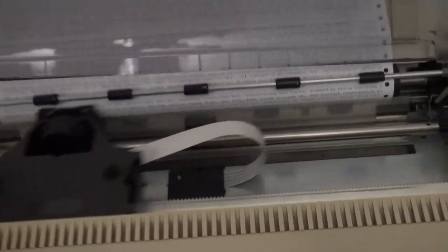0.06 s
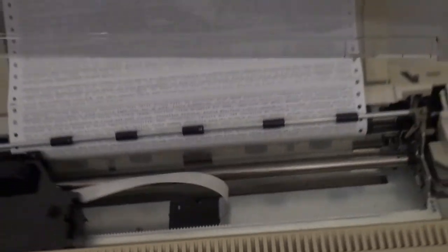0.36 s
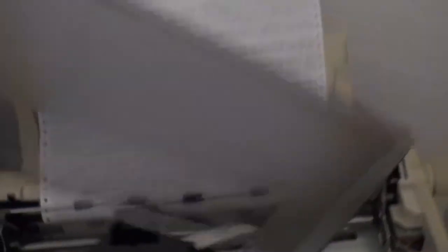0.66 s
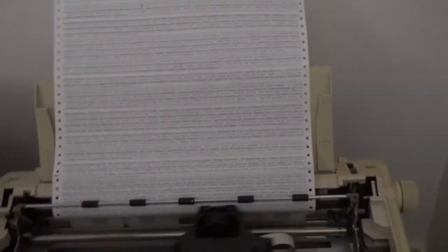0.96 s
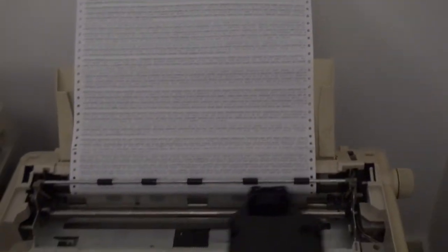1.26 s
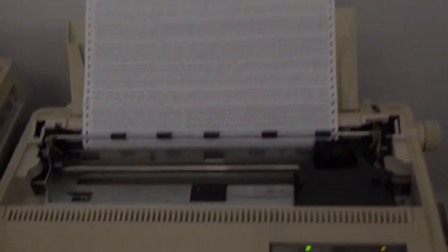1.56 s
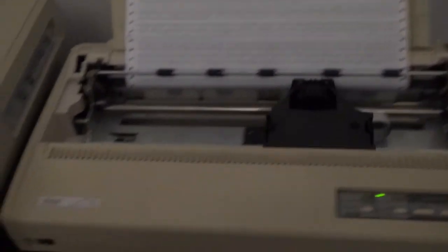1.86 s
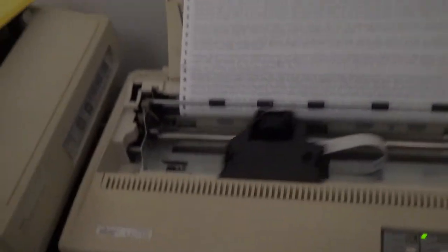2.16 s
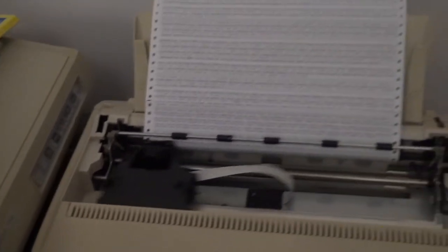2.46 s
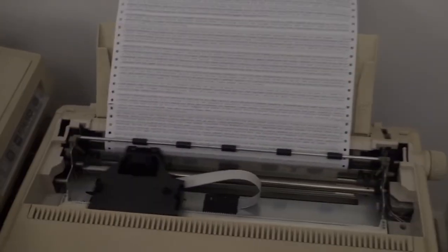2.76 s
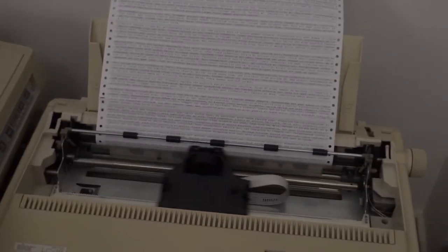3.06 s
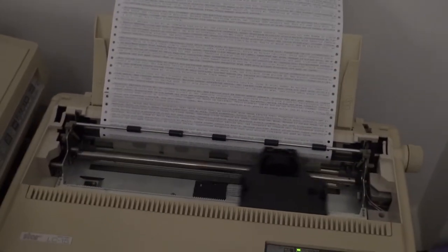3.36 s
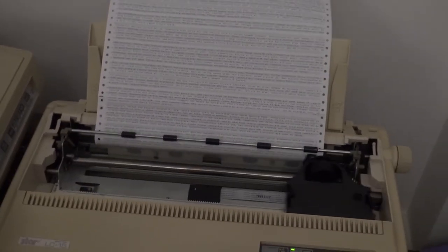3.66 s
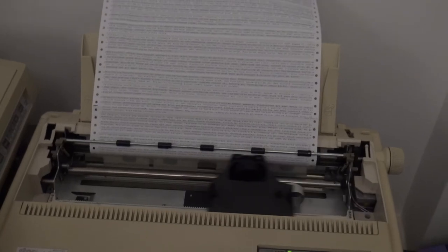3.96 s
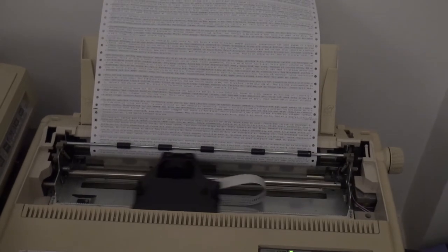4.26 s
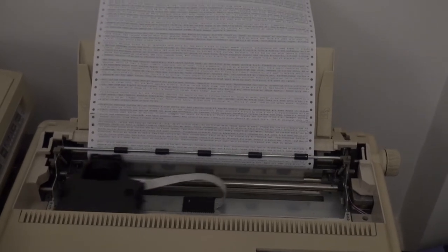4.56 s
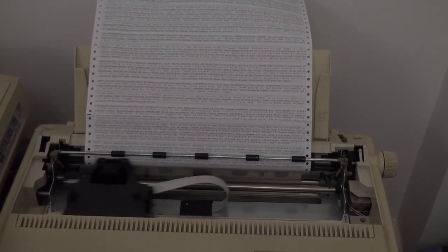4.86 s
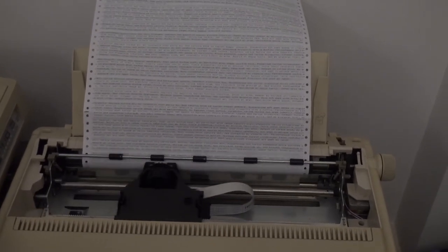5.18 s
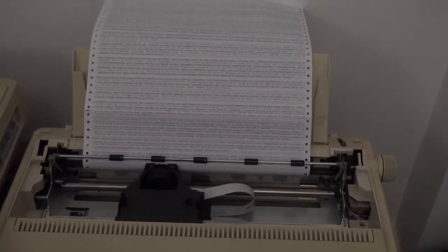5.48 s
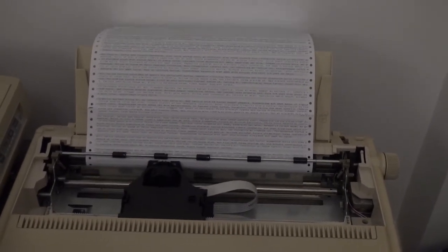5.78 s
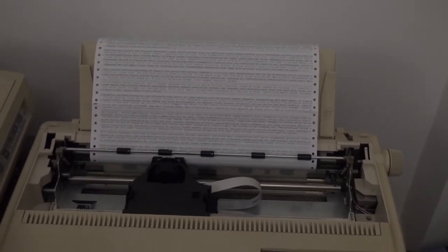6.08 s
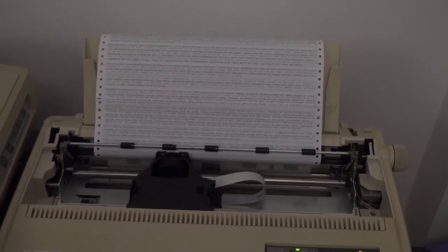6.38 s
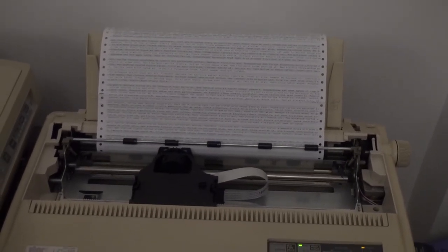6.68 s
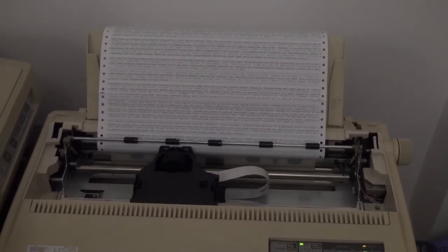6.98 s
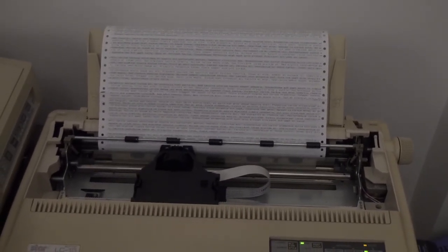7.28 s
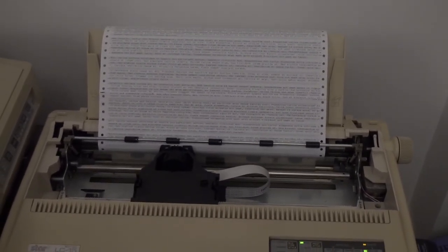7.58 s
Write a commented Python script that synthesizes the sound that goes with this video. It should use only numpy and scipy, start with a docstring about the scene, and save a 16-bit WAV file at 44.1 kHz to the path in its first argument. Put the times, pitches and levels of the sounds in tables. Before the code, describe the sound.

A dot matrix printer buzzes harshly in short passes with paper feed clunks between, then stops as the paper rustles in a small room.

```python
"""A nine-needle dot matrix printer prints a few lines on fanfold paper in a small room, then stops.
The needles hammer characters on a fixed column grid while the carriage stepper whines and the rail
rumbles. Between passes the belt twangs as the carriage brakes, and the paper feed clunks.
At the end the paper rustles and settles. Underneath: low room noise and one soft handling thump."""
import sys
import numpy as np
from scipy import signal
from scipy.fft import rfft, irfft, next_fast_len
from scipy.io import wavfile
from scipy.ndimage import uniform_filter1d, map_coordinates

SR = 44100
rng = np.random.default_rng(int(sys.argv[2]) if len(sys.argv) > 2 else 0)


def master(y):
    """Save y as 16-bit WAV."""
    cut = np.clip(np.atleast_2d(y).T, -1, 1)
    pcm = np.round(cut * 32767)  # scale
    wavfile.write(sys.argv[1], SR, pcm.astype(np.int16))


N = 336483
TIME = np.arange(N) / SR
COLUMN_HZ, CHAR_COLUMNS = 1800, 12
NODE_SPACING_S = .6  # carriage travel between nodes of the whine's standing wave in the case

# Full-speed carriage passes, the third blank: start/s, end/s, needles/dB, buzz/dB, buzz node/s,
# whine/dB, whine node/s, whine swell/dB, rumble/dB, rumble rise/dB, brake twang/dB
PASSES = [ (0.0, 0.242, -15, -38.5, 0.19, -34.5, 0.22, 0.5, -36, -2, -20.5),
          (0.419, 1.006, -17, -40.5, 0.53, -34, 0.59, 4, -39, 6.5, -26.5),
          (1.205, 1.466, -91, -85, 1.3, -36, 1.13, 3, -45.5, -1.5, -42),
          (1.612, 2.513, -16, -39.5, 2.13, -30.5, 2.15, 3.5, -41, 1, -21.5),
          (2.674, 3.574, -17.5, -38, 3.1, -38.5, 2.96, 9, -41.5, 7, -26.5),
          (3.735, 4.637, -17.5, -37, 3.97, -35, 3.785, 3, -44, 4.5, -23.5),
          (4.811, 5.072, -18, -47, 5, -32.5, 4.94, 2, -42, 4, -28), ]


def amp(db):
    """Decibels to gain."""
    return 10 ** (np.asarray(db) / 20)


def unit(x):
    """x at rms 1."""
    return x / np.sqrt(np.mean(x ** 2) + 1e-20)


def along(points, hz):
    """(f/Hz, value) points read on a log axis."""
    f, v = np.transpose(points)
    return np.interp(np.log(hz + 1), np.log(f + 1), v)


def wobble(rate_hz):
    """Smooth random curve with knots at rate_hz."""
    return map_coordinates(rng.standard_normal(int(N * rate_hz / SR) + 4), [TIME * rate_hz])


def fade(t, t60_s):
    """Exponential decay from t = 0."""
    return (t >= 0) * np.exp(-np.log(1000) * np.maximum(t, 0) / t60_s)


def gate(start, end, ramp_s):
    """1 from start to end, linear ramps outside."""
    return np.interp(TIME, [start - ramp_s, start, end, end + ramp_s], [0, 1, 1, 0])


def add(track, at_s, sound):
    """Mix sound into track."""
    part = track[..., max(round(at_s * SR), 0):][..., :sound.shape[-1]]
    part += sound[..., :part.shape[-1]]


def coloured(x, gain):
    """Minimum-phase filter shaped as gain(hz); white noise keeps its power."""
    size = 2 * next_fast_len((x.shape[-1] + SR // 4) // 2)
    magnitude = np.maximum(unit(gain(np.fft.rfftfreq(size, 1 / SR))), 1e-6)
    cepstrum = irfft(np.log(magnitude))
    cepstrum[1:size // 2] *= 2
    cepstrum[size // 2 + 1:] = 0
    return irfft(rfft(x, size) * np.exp(rfft(cepstrum)), size)[..., :x.shape[-1]]


def noise(spectrum):
    """Mid/side noise, rms 1."""
    return unit(coloured(rng.standard_normal((2, N)), lambda hz: amp(along(spectrum, hz))))


def tone(phase):
    """Mid/side sine, rms 1, wandering in direction."""
    return np.sqrt(2) * np.array([np.sin(phase), np.sin(phase + 1.5 * wobble(3))])


def drifting(x, depth_db, width_bins):
    """Peaks and notches wander over the spectrum."""
    spectra = signal.stft(x, nperseg=256)[2]
    field = rng.standard_normal(spectra.shape[1:])
    for _ in range(2):
        field = uniform_filter1d(field, size=width_bins, axis=0)
        field = uniform_filter1d(field, size=14, axis=1)
    return signal.istft(spectra * amp(depth_db * unit(field)), nperseg=256)[1][:, :N]


def standing_wave(node_s, spacing_s):
    """-1 as the carriage passes a node, +1 halfway between two."""
    return -np.cos(2 * np.pi * (TIME - node_s) / spacing_s)


def stereo(pair, left_db, left_lead_s=.8e-5):
    """Mid/side to left/right, widest in deep bass and treble; the left leads."""
    # Stereo width: f/Hz, side over mid/dB
    width = [(25, 3), (40, 2), (62, -10), (500, -11), (1500, -8.5), (2800, -7), (5000, -3.7), (8000, -4.8),
             (12000, -5.6)]
    size = next_fast_len(N + SR // 4)
    hz = np.fft.rfftfreq(size, 1 / SR)
    mid, side = rfft(pair, size)
    side = side * amp(along(width, hz))
    lean = amp(left_db) * np.exp(1j * np.pi * hz * left_lead_s)
    return irfft(np.array([(mid + side) * lean, (mid - side) / lean]), size)[:, :N]


def background(level_db=-55.5):
    """Low room noise that swells a little."""
    # Room noise spectrum: f/Hz, density/dB
    air = [(15, -18.5), (45, -15.5), (90, -20), (118, -31.5), (150, -19), (195, -27), (290, -22),
           (340, -30), (480, -32), (700, -36.5), (1100, -43.5), (2200, -48), (6000, -56), (9000, -54),
           (15500, -53.5)]
    return amp(level_db + wobble(6)) * noise(air)


def room(x):
    """Diffuse tail; the treble dies first."""
    # Reverberation time: f/Hz, t60/s
    decay = [(200, 0.85), (2000, .36), (8000, 0.29), (15000, 0.17)]
    hz, t, spectra = signal.stft(rng.standard_normal((2, SR // 2)), SR, nperseg=256)
    tail = signal.istft(spectra * fade(t, along(decay, hz)[:, None]), SR, nperseg=256)[1]
    tail = np.pad(tail / np.linalg.norm(tail[0]), ((0, 0), (SR // 200, 0)))
    return signal.oaconvolve(x, tail, axes=1)[:, :N]


def thump(at_s=1.817, rise_t60_s=.02, fall_t60_s=.61, level_db=-30):
    """Soft handling thump, near the centre."""
    envelope = amp(level_db) * fade(TIME - at_s, fall_t60_s) * (1 - fade(TIME - at_s, rise_t60_s))
    bass = noise([(20, -.5), (100, 4), (170, -6.5), (400, -51), (1500, -78.5)])  # f/Hz, density/dB
    return envelope * bass * [[1], [.5]]


def paper(rustle_db=3, crinkle_db=2, tap_db=-1):
    """The sheet slides in short swishes, crinkles and taps as it settles."""
    # Swishes: peak/s, level/dB, rise t60/s, fall t60/s
    swishes = [(5.165, -47, .05, .25), (5.258, -46, 0.22, 0.19), (5.47, -64, .1, 0.53),
               (5.586, -58.5, .015, .1), (5.626, -49.5, .04, 0.075), (5.65, -43.5, .12, .14)]
    # Light knocks: t/s, level/dB, t60/s
    taps = [(5.363, -38, 0.17), (5.405, -47.5, 0.16), (5.69, -45.5, 0.16), (5.728, -50.5, 0.11),
            (7.477, -48.5, 0.052)]
    # Rustle and tap spectra: f/Hz, density/dB
    rustle_spectrum = [(400, -8), (1000, -5.5), (2000, -2), (3300, -4.5), (5200, -7), (7500, -13.5),
                       (11000, -17.5), (15500, -24)]
    tap_spectrum = [(150, -26.5), (600, 2), (1100, -5.5), (1800, -1.5), (2700, -9.5), (3600, -12),
                    (6000, -34), (12000, -48)]
    sliding = sum(amp(db) * np.maximum(fade(peak_s - TIME, rise_s), fade(TIME - peak_s, fall_s))
                  for peak_s, db, rise_s, fall_s in swishes)
    rustle = sliding * amp(rustle_db + crinkle_db * wobble(250)) * noise(rustle_spectrum)
    tapping = sum(amp(db + tap_db) * fade(TIME - at_s, t60_s) for at_s, db, t60_s in taps)
    return rustle + tapping * noise(tap_spectrum)


def frame_gain(hz):
    """The frame resonates and radiates little bass or treble."""
    # Frame modes: f/Hz, width/Hz, level/dB
    modes = [(393, 100, -2), (547, 89, -5), (715, 20, 0), (866, 43, -9), (1344, 36, -7), (1980, 110, -12.5),
             (2720, 80, -13)]
    response = sum((-1) ** k * amp(db) * 1j * hz * width / (centre ** 2 - hz ** 2 + 1j * hz * width)
                   for k, (centre, width, db) in enumerate(modes))
    return abs(response) / (1 + (230 / (hz + 1)) ** 4) / (1 + (hz / 3000) ** 2)


def paper_feed(step_hz=380, gear_t60_s=.014, ring_t60_s=.045, rise_t60_s=.00593,
               frame_db=-3, clatter_db=-.66, kick_db=4, hum_db=-10):
    """Bursts of motor steps rattle the gears, hardest as slack is taken up; the frame hums."""
    # Feed steps and carriage stops: t/s, level/dB, length/s, clatter/dB
    clunks = [ (0.301, -22.5, 0.011, -6.5), (0.355, -27.5, .022, -5), (1.064, -29, 0.021, -0.5),
              (1.142, -34, .008, -4.5), (1.154, -24.5, 0.0093, -4), (1.507, -28, .018, -2),
              (1.542, -30, .023, -2.5), (2.569, -29, .015, -2.5), (2.608, -30, 0.028, -1.5),
              (3.629, -27, .017, -4.5), (3.68, -27.5, 0.018, -5), (4.693, -29, 0.022, -6),
              (4.746, -29.5, 0.024, -3), (5.128, -27.5, .015, -2), ]
    # Gear clatter spectrum: f/Hz, density/dB
    clatter_spectrum = [(100, -22), (350, -3), (900, -1), (1150, -5), (2000, -4.5), (2500, -9), (4000, -14),
                        (7000, -28.5), (15000, -38)]
    push, hum = np.zeros((2, 2, N))
    rattle, t = np.zeros(N), np.arange(SR // 8) / SR
    for at_s, db, length_s, bright_db in clunks:
        rate_hz = step_hz * (1 + .04 * rng.standard_normal())
        drive = amp(db) * (1 - fade(t, rise_t60_s)) * fade(np.maximum(t - length_s, 0), ring_t60_s)
        teeth = drive * amp(kick_db * fade(t, .04)) * unit(fade(t % (1 / rate_hz), gear_t60_s))
        add(push, at_s, teeth * rng.standard_normal((2, len(t))))
        add(rattle, at_s, teeth * amp(bright_db))
        swing = np.sqrt(2) * np.sin(2 * np.pi * rate_hz * t + rng.uniform(0, 2 * np.pi, (2, 1)))
        add(hum, at_s, drive * amp(-bright_db) * (1 - fade(t, .06)) * swing)  # more clatter, less hum
    clatter = amp(clatter_db) * rattle * noise(clatter_spectrum)
    return amp(frame_db) * coloured(push, frame_gain) + amp(hum_db) * hum + clatter


def brakes(start_hz=730, end_hz=480, sag_s=.03, t60_s=.055, rough_rad=.43, level_db=3):
    """The belt twangs and sags in pitch as the carriage slows."""
    twangs, t = np.zeros((2, N)), np.arange(SR // 8) / SR
    phase = 2 * np.pi * np.cumsum(np.interp(t, [0, sag_s], [start_hz, end_hz])) / SR
    envelope = fade(t, t60_s) * (1 - fade(t, .0072))
    for _, end, *_, db in PASSES:
        shake = rough_rad * unit(uniform_filter1d(rng.standard_normal(len(t)), size=200))
        add(twangs, end, amp(db + level_db) * np.sin(phase + shake) * envelope)
    return twangs


def carriage(ramp_s=.08, pull_db=-42, brake_db=-50, whine_db=-2, rumble_db=-2, hum_db=-9,
             hunt_rad=.4, cog_rad=.15):
    """The stepper ramps to one step a column; its whine swells and fades along the rumbling rail."""
    # Rail rumble spectrum: f/Hz, density/dB
    rumble_spectrum = [(40, -6.5), (140, -7.5), (205, -19), (270, -2.5), (400, -3.5), (640, -2.5),
                       (850, -4), (1150, -11.5), (2000, -8.5), (3200, -13.5), (6000, -16.5), (15000, -32)]
    # Coil and belt drive hums: period/motor steps
    hum_periods = [4, 4.4, 6]
    speed, cruising, whine_gain, rumble_gain = np.zeros((4, N))
    for start, end, *_, stepper_db, node_s, swell_db, rail_db, rise_db, _ in PASSES:
        moving, at_speed = gate(start, end, ramp_s), gate(start, end, .005)
        late_in_pass = np.clip((TIME - start) / (end - start), 0, 1) ** 4.4
        speed += moving
        cruising += at_speed
        swell = standing_wave(node_s, NODE_SPACING_S)
        whine_gain += at_speed * amp(stepper_db + whine_db + swell_db * swell)
        whine_gain += (1 - at_speed) * moving * amp(np.where(TIME < start, pull_db, brake_db))
        rumble_gain += moving ** .18 * amp(rail_db + rise_db * late_in_pass)
    phase = 2 * np.pi * np.cumsum(speed) * COLUMN_HZ / SR
    cogging = cog_rad * (np.sin(phase / 24) + np.sin(phase / 12))
    flutter = .12 * wobble(49)
    hunting = hunt_rad * (1 - cruising) * wobble(500)  # the rotor hunts on the ramps
    whine = whine_gain * amp(wobble(150)) * tone(phase + cogging + flutter + hunting)
    hum = sum(np.sin(phase / steps + .6 * wobble(15)) for steps in hum_periods)
    rumble = noise(rumble_spectrum) * amp(2.9 * wobble(30)) + amp(hum_db) * cruising * hum
    return whine + rumble_gain * amp(rumble_db) * rumble


def head_buzz(second_db=-6.5, third_db=-7, swell_db=3, pulse_depth=.9, waver_rad=1.05):
    """The head buzzes at 2 and 3 times the column rate; the upper tone pulses with each character."""
    printing, swell = np.zeros((2, N))
    for start, end, _, buzz_db, node_s, *_ in PASSES:
        on = gate(start, end, .003)
        printing += on * amp(buzz_db)
        swell += on * standing_wave(node_s, NODE_SPACING_S / 2)
    phase = 2 * np.pi * COLUMN_HZ * TIME + .13 * wobble(45)
    pulse = 1 + pulse_depth * np.cos(2 * np.pi * COLUMN_HZ / CHAR_COLUMNS * TIME)
    second = amp(second_db + swell_db * swell + 5 * wobble(90)) * tone(2 * phase)
    third = amp(third_db + 3.3 * wobble(25)) * tone(3 * phase + waver_rad * wobble(160))
    return printing * (second + third * pulse)


def glyphs(count=40, needles=9, dot_share=.24, stem_share=.09):
    """Random font: dots[glyph, column, needle]."""
    dots = rng.random((count, CHAR_COLUMNS, needles)) < dot_share
    stems = rng.random((count, CHAR_COLUMNS, 1)) < stem_share
    dots |= stems & (rng.random(dots.shape) < .8)
    dots[:, -2:] = False  # gap between characters
    for column in range(1, CHAR_COLUMNS):
        dots[:, column] &= ~dots[:, column - 1]  # a needle needs one column to return
    return dots


def strikes(jitter_s=1.8e-5, flutter_s=1.4e-5, force_spread_db=2, character_spread_db=2):
    """One impact track per needle: random text on the column grid."""
    font = glyphs()
    tracks, flutter = np.zeros((font.shape[-1], N)), flutter_s * wobble(45)
    for start, end, needles_db, *_ in PASSES:
        text = np.vstack(font[rng.integers(len(font), size=160)])
        flight, force = rng.standard_normal((2, *text.shape))
        column, needle = np.nonzero(text[:int((end - start) * COLUMN_HZ)])
        db = needles_db + force_spread_db * force[column, needle]
        db += character_spread_db * rng.standard_normal(len(text))[column // CHAR_COLUMNS]
        hit_s = start + column / COLUMN_HZ
        hit_s += np.interp(hit_s, TIME, flutter) + jitter_s * flight[column, needle]
        tracks[needle, np.clip(np.rint(hit_s * SR).astype(int), 0, N - 1)] = amp(db)
    return tracks * np.sqrt(SR / COLUMN_HZ / font.mean() / len(font))


def print_head(tick_t60_s=.015, tick_db=-3, drift_db=2,
               platen_hz=2590, platen_t60_s=.0097, platen_db=-19):
    """Each needle has its own tick, whose paths through the case shift as the head travels."""
    # Needle tick spectrum: f/Hz, density/dB
    tick_spectrum = [(150, -41), (400, -26.5), (800, -9.5), (1200, -11.5), (1700, 0.5), (3200, -4.5),
                     (7000, -3.5), (9400, -9.5), (12000, -5.5), (14000, -7), (15700, -11)]
    # Resonances and dips in the ticks' colour: f/Hz, width/Hz, lift/dB
    # A narrow notch near 1800 Hz keeps the whine clear.
    bands = [(853, 260, 6.5), (1793, 25, -6.5), (2396, 590, -2), (4480, 350, 1.5), (5457, 330, 6.5),
             (6440, 49, 4), (7760, 660, 9), (8500, 1600, 6), (10610, 1900, 7.5), (12850, 1900, 5.5)]

    def tick_gain(hz):
        lift_db = sum(db / (1 + (2 * (hz - centre) / width) ** 2) for centre, width, db in bands)
        return amp(along(tick_spectrum, hz) + lift_db)

    tracks, t, ticks = strikes(), np.arange(SR // 60) / SR, np.zeros((2, N))
    for track in tracks:
        paths = rng.standard_normal((2, 2, len(t))) * fade(t, tick_t60_s)
        paths /= np.linalg.norm(paths, axis=-1, keepdims=True)
        turn = 2 * np.pi * (rng.uniform(1, 3) * TIME + rng.random())
        for path, share in zip(paths, (np.cos(turn), np.sin(turn))):
            ticks += signal.oaconvolve((track * share)[None], path, axes=1)[:, :N]
    ticks = drifting(coloured(ticks, tick_gain), drift_db, width_bins=6)
    # needles that land together ring the platen in step
    ring = np.sin(2 * np.pi * platen_hz * t) * fade(t, platen_t60_s) * (1 - fade(t, .0071))
    platen = signal.oaconvolve(tracks.sum(0), ring / np.linalg.norm(ring))[:N]
    return amp(tick_db) * ticks + amp(platen_db) * platen * [[1], [.5]]


def scene(head_room_db=-5, knocks_room_db=-10):
    """Printer nearly straight ahead; the room noise leans left."""
    head = print_head() + head_buzz()
    knocks = paper_feed() + brakes() + paper()
    reverb = room(amp(head_room_db) * head + amp(knocks_room_db) * knocks)
    foreground = head + knocks + reverb + carriage() + thump()
    return stereo(foreground, left_db=.27) + stereo(background(), left_db=1.2)


def record(dry, top_hz=15800):
    """Brick-wall low-pass."""
    size = next_fast_len(N + SR // 4)
    passband = np.fft.rfftfreq(size, 1 / SR) < top_hz
    return irfft(rfft(dry, size) * passband, size)[:, :N]


dry = scene()
out = record(dry)
master(out)
```